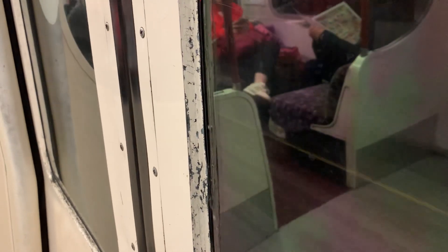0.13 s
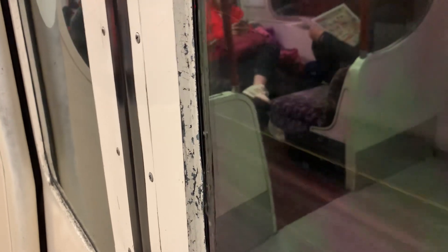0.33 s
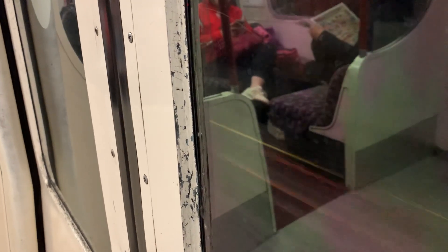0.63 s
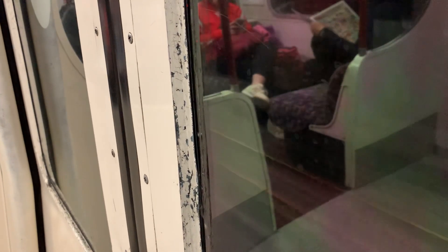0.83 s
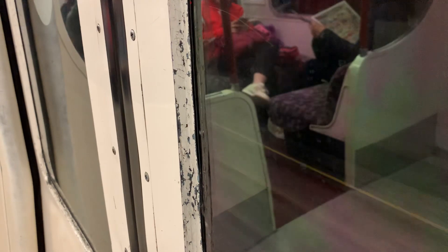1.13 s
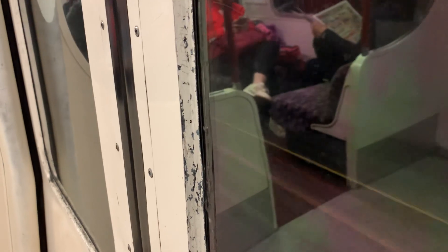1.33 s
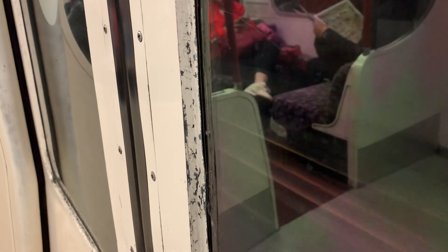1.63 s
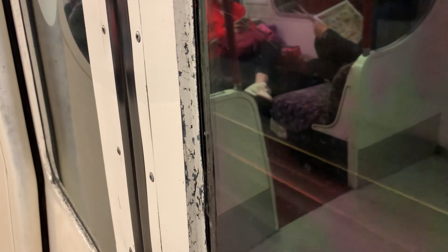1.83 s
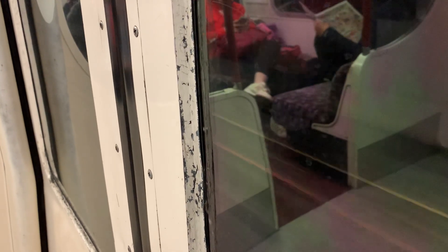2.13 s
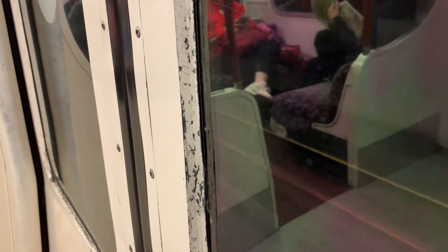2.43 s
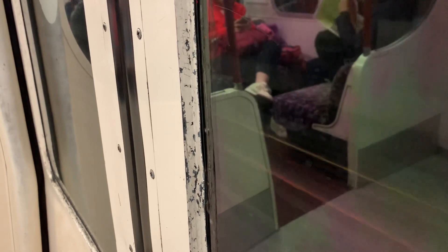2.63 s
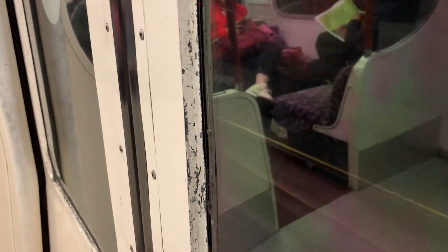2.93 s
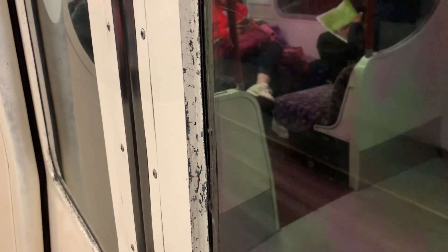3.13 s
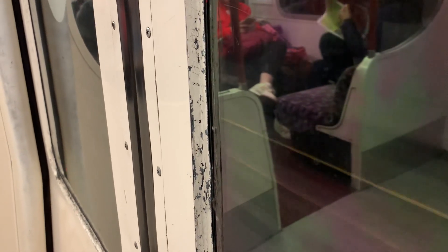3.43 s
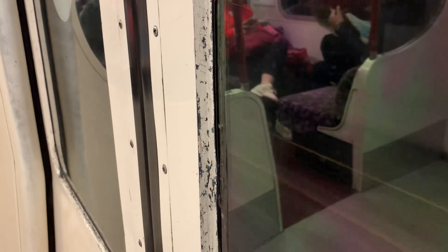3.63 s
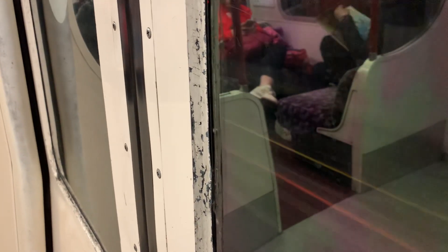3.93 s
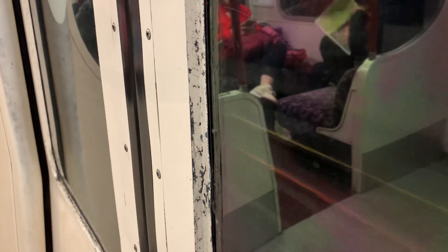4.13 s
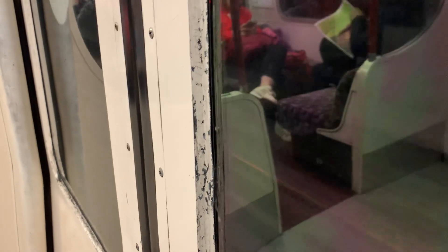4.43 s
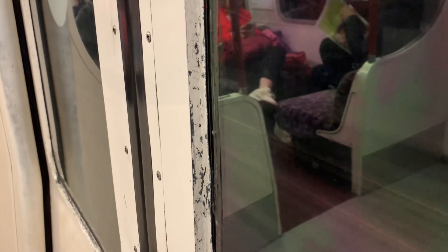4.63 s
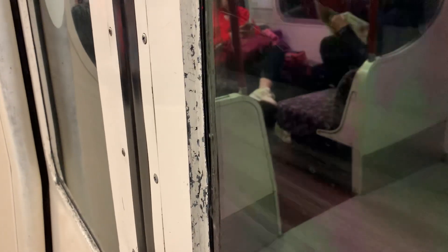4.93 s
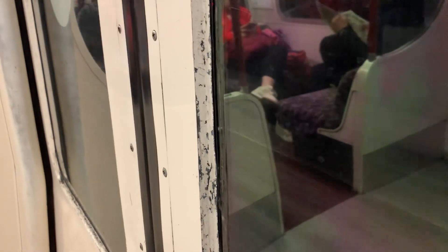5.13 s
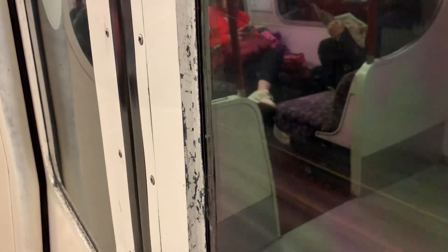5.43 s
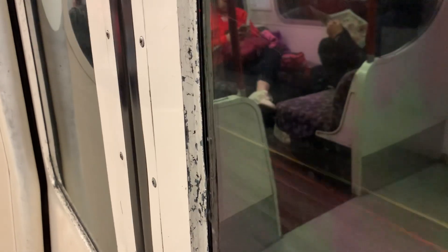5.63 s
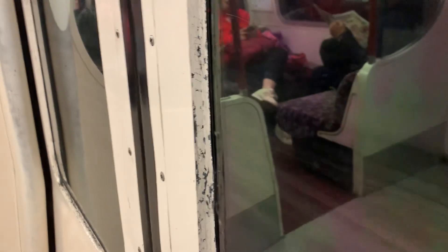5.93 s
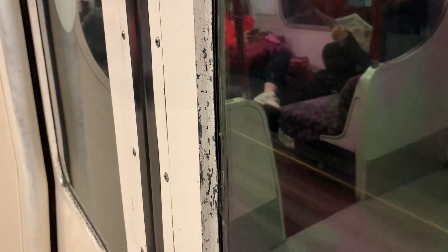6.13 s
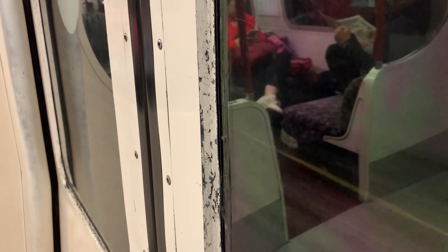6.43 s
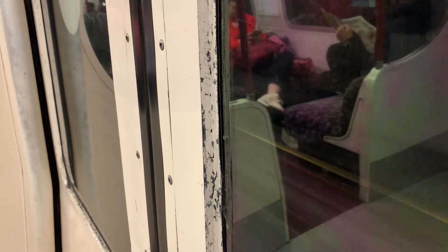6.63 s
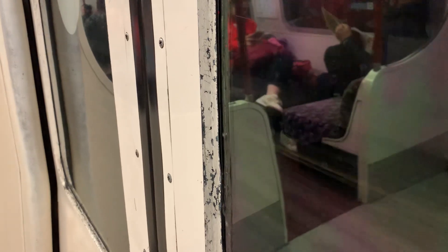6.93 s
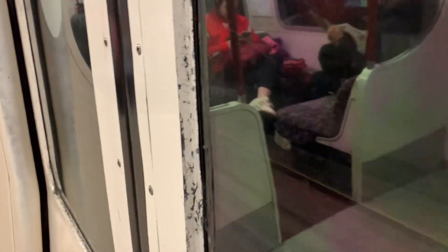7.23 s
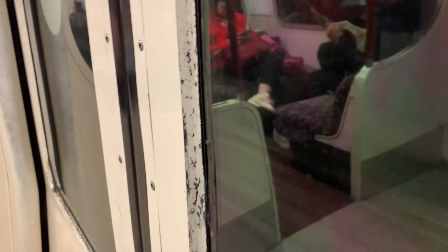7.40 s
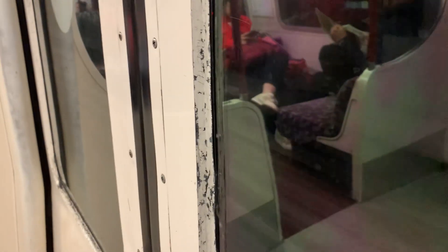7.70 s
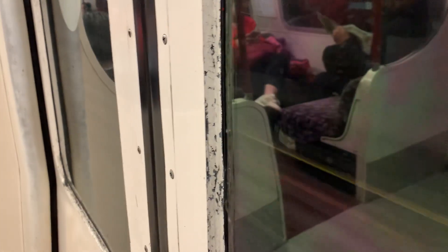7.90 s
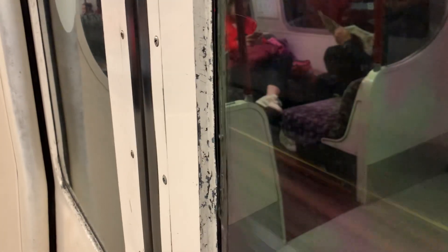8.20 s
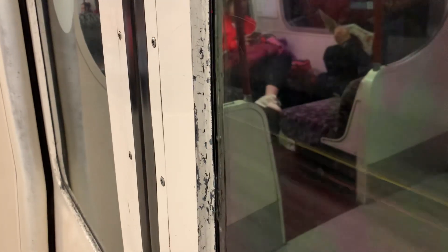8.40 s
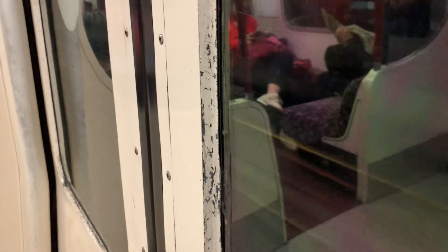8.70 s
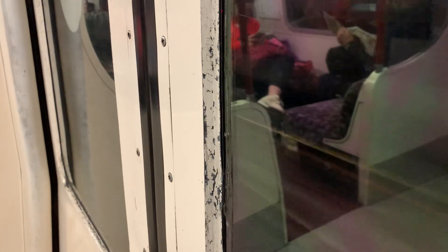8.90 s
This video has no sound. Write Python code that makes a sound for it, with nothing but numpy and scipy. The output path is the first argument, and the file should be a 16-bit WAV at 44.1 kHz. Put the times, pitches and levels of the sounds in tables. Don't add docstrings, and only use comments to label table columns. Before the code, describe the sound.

Inside an underground carriage running through a tunnel, stereo microphone close to the door on the right, bass weaker on the left. Throughout, a deep uneven rumble, grainy mid wheel roar and thin steady air hiss. From 0 to 3 s a wavering, beating rail whine around 800 Hz swells and dips, strongest near 2.5 s, with short singing bursts around 1 s and a light rattle at 0.5 s. The whine falls away after 3 s. At 3.9 s a hard metallic clack with bright crackle. From 4.9 to 6 s the shell lurches; small knocks and brief high squeaks come at 5.1, 5.7 and 6.4 to 6.7 s, with a clunk at 6.85 s. A very faint high motor tone slowly sinks. From 7 s the floor booms and drones in overlapping low notes, heaviest from 7.7 s to the end at 9 s, with rough scrubbing, low groaning squeals, louder roar and gustier hiss.

```python
import sys
import numpy as np
from scipy import signal
from scipy.fft import rfft, irfft, next_fast_len
from scipy.io import wavfile

SR = 44100
rng = np.random.default_rng(int(sys.argv[2]) if len(sys.argv) > 2 else 0)


def ratio(d):
    e = np.asarray(d, float) / 20
    return 10 ** e


def dump_mix(stems):
    frames = np.atleast_2d(stems).T
    limited = np.clip(frames, -1, 1)
    pcm = np.round(limited * 32767).astype(np.int16)
    wavfile.write(sys.argv[1], SR, pcm)


N = 399546

# freq_hz, density_db (per Hz)
SHELL_SPECTRUM = [(14, -29), (25, -9.5), (38, -9.5), (50, -4), (65, -1.5), (90, -4), (110, -7), (140, -34)]
FLOOR_SPECTRUM = [(80, -36), (110, -2), (200, -1.5), (260, -4.5), (330, -6), (450, -11.5), (800, -21)]
ROAR_SPECTRUM = [(220, -11.5), (340, 2), (500, -1.5), (700, 0), (950, -3.5), (1100, -9), (1300, -16),
                 (1700, -33.5)]
WHEEL_SPECTRUM = [(1000, -49), (1350, 3.5), (1700, 2), (2500, -2), (3000, -8), (4000, -13), (6500, -27.5)]
SEAL_SPECTRUM = [(2000, -22.5), (3000, -3), (4500, -3), (5500, -11), (7000, -10), (8500, -9.5),
                 (10500, -13.5), (12500, -17.5), (15200, -25)]
# freq_hz, width_hz, lift_db
SHELL_MODES = [(66.8, 9.2, 5.5), (90.5, 30, 6.5)]
FLOOR_MODES = [(140, 25, 6.95), (170.7, 21, 3.8), (201, 18, 2.9), (239.3, 24, 6.1), (300, 15, 6.9),
               (362, 10, 1.5)]
WHEEL_MODES = [(2208, 390, 8.1)]
# freq_hz, width_hz, level_db
RAIL_MODES = [(802, 29, -1.5), (960, 69, -8.5)]
# time_s, boom_db
TRACK_ROUGHNESS = [(0, -23), (1.5, -27), (2.9, -27), (3.4, -26), (3.9, -27.5), (4.3, -27.5), (4.8, -25),
                   (5.5, -25), (6.7, -22.5), (7.3, -19), (7.9, -15.5), (8.45, -16), (8.76, -17),
                   (9.06, -12)]
# start_s, length_s, lift_db
LURCHES = [(0.554, 0.22, -0.5), (1.06, 0.25, 2.5), (2.21, 0.18, -2), (2.704, 0.5, 1), (3.45, 0.37, 3.5),
           (3.843, 0.16, 5.5), (4.9, 0.34, 4.5), (5.234, 0.56, 5.5), (5.913, 0.24, 7.5), (6.397, 0.18, 4),
           (7.14, 0.14, 3), (7.49, 0.27, 3), (7.895, 0.24, 1)]
# time_s, roar_db
WHEEL_LOAD = [(0, -22), (0.6, -20), (1.1, -21.5), (1.6, -20.5), (2.2, -21.5), (3.05, -20.5), (3.38, -23.5),
              (3.75, -22), (4.31, -26), (5.0, -22), (5.6, -23), (6.3, -24), (7.1, -24), (7.75, -24.5),
              (7.95, -20.5), (8.15, -24), (8.38, -20), (8.55, -17), (8.75, -18), (9.06, -23)]
# low_hz, high_hz
RIPPLE_HZ = (790, 817)
# time_s, low_note_db, high_note_db
RIPPLE_LEVELS = [(0, -38, -36), (.3, -31, -33), (.6, -36, -29), (.85, -38, -31), (1.1, -40, -38),
                 (1.4, -40, -37), (1.6, -38, -28), (1.85, -35, -29), (2.05, -30, -33), (2.3, -33, -33),
                 (2.5, -27, -30), (2.7, -28, -31), (2.95, -29, -33), (3.15, -34, -35), (3.4, -37, -29),
                 (3.7, -40, -33), (4.2, -46, -40), (9.06, -55, -50)]
# start_s, length_s, pitch_hz, level_db
RAIL_SINGING = [(.78, 0.23, 956, -32.5), (1.27, 0.14, 960, -26.5), (1.42, 0.16, 1017, -34.5),
                (2.25, 0.18, 972, -35), (2.78, 0.15, 945, -30), (3.02, 0.13, 965, -34),
                (7.85, 0.2, 718, -28.5), (8.42, 0.12, 684, -23), (8.45, 0.34, 820, -35)]
# start_s, length_s, pitch_hz, level_db
RAIL_BURSTS = [(1.045, .055, 785, -25), (1.125, .05, 800, -22), (1.125, .11, 835, -28),
               (1.18, .025, 800, -24), (1.205, .022, 820, -24), (1.425, .035, 580, -23),
               (1.49, .035, 1000, -27), (2.88, .09, 632, -28), (3.0, .08, 770, -26), (.26, .08, 850, -29),
               (.52, .09, 835, -26)]
# start_s, length_s, level_db
SCRUBS = [
    (5.08, 0.36, -55),
    (7.75, 0.46, -36),
    (8.292, 0.64, -36),
    (8.5, 0.19, -38.5),
    (8.9, 0.32, -36),
]
# start_s, length_s, lift_db
GUSTS = [
    (.4, 0.14, 0),
    (1.1, 0.5, 1),
    (3.75, 0.22, 1.5),
    (4.293, 5.1, 2.5),
    (4.5, 0.39, 3),
    (4.945, 0.49, 4.5),
    (6.494, 0.89, 1.5),
    (7.686, 0.77, 2),
    (8.182, 0.83, 6),
    (8.456, 0.38, -1.5),
]
# time_s, pitch_hz, level_db
MOTOR_TONE = [
    (0, 4720, -72),
    (4.6, 4680, -68),
    (5.2, 4620, -60),
    (6.6, 4450, -62),
    (9.06, 4200, -72),
]
# start_s, rise_s, pitch_hz, level_db
RATTLES = [(.49, .044, 8600, -53.5), (.5, 0.055, 4200, -44.5), (.52, 0.035, 5600, -50),
           (0.571, .03, 4500, -48.5), (.57, 0.019, 5900, -48), (1.34, .015, 13000, -73),
           (2.319, .015, 1565, -48), (3.83, .004, 8940, -55), (3.879, 0.012, 1620, -31),
           (3.9, .015, 1850, -35), (3.885, .004, 2600, -32), (3.9, .004, 3600, -51),
           (3.92, .004, 2900, -43), (3.877, .002, 2320, -32), (3.879, .002, 3240, -43),
           (3.896, .002, 1090, -29), (3.913, .002, 1980, -30), (3.911, .002, 950, -23),
           (3.878, .002, 5200, -64), (4.089, 0.0087, 1500, -34), (4.619, .012, 4120, -47),
           (5.004, .005, 5930, -49), (5.13, 0.017, 2120, -29), (5.152, 0.018, 2500, -51),
           (5.289, 0.019, 4600, -58), (5.751, .01, 3250, -46), (6.388, 0.018, 2180, -25),
           (6.68, .12, 13000, -60), (6.842, .003, 1590, -32), (6.847, .002, 1260, -32.5),
           (6.73, .004, 2250, -41), (6.965, .004, 2100, -37), (6.447, .01, 2100, -39),
           (5.185, .004, 2030, -37), (5.135, .004, 2300, -40), (6.89, 0.0058, 9000, -53),
           (7.299, 0.022, 4630, -47.5), (7.80, 0.0074, 4800, -54), (7.979, .004, 2100, -35),
           (8.338, 0.0037, 9700, -49.5), (8.457, .002, 8600, -44), (8.461, 0.0013, 10200, -43),
           (8.461, .0013, 12800, -50)]
# start_s, t60_s, level_db
CRACKLES = [(3.83, 0.2, -47), (3.876, 0.28, -35), (3.899, 0.09, -45), (3.913, .1, -46), (6.845, .05, -47),
            (7.891, .06, -50), (7.977, .08, -46), (5.005, 0.24, -43), (5.289, .12, -45), (6.891, .15, -46),
            (7.80, 0.15, -52), (8.456, .05, -45)]
# start_s, length_s, pitch_hz,
# level_db
PANEL_HUMS = [(.72, 0.15, 300, -30), (1.25, 0.19, 165.6, -21.5), (1.42, 0.25, 245, -24.5),
              (1.78, 0.17, 163, -22), (2.2, 0.37, 163.8, -26.5), (2.8, 0.18, 316, -28),
              (5.4, 0.15, 203, -22), (5.6, 0.28, 225.7, -23), (5.3, 0.48, 362, -38),
              (6.06, .2, 170, -19.5), (6.1, 0.25, 120, -21), (6.26, 0.27, 198, -23.5),
                (6.55, 0.34, 174.2, -17), (6.653, 0.13, 308, -25), (6.8, 0.08, 194.4, -17),
                (6.85, 0.26, 140.3, -27), (7.7, 0.16, 138, -14.5), (7.28, 0.18, 120, -14.5),
                (7.279, 0.21, 211, -30), (7.38, 0.24, 165.7, -16.5), (7.44, .12, 129, -23),
                (7.521, 0.19, 66, -15), (7.55, 0.25, 192, -25), (7.56, .16, 274.3, -22),
                (7.578, 0.29, 300, -22.5), (7.6, 0.1, 133.6, -18), (7.696, .14, 318, -22),
                (7.77, 0.16, 176.6, -14.5), (7.76, 0.14, 212.5, -17), (7.73, 0.15, 138, -14),
                (7.68, 0.09, 262, -19), (7.93, .24, 138.8, -12.5), (7.92, 0.15, 204, -18),
                (7.914, 0.18, 52.6, -23), (8.15, 0.1, 190, -13.5), (8.101, .14, 248.3, -26),
                (8.16, 0.16, 198.7, -20.5), (8.158, 0.25, 301, -18), (8.32, .16, 131.5, -19),
                (9.6, 0.18, 201.6, -15.5), (8.329, 0.18, 252.5, -20), (8.34, 0.28, 150.4, -18.5),
                (8.409, 0.13, 260, -20.5), (8.45, .2, 165.7, -10.5), (8.48, .24, 197.2, -13),
                (8.5, 0.39, 249.5, -21), (8.444, 0.27, 48, -22), (8.64, 0.15, 185, -12),
                (8.661, 0.14, 239.4, -19.5), (8.622, 0.31, 300, -17), (8.66, 0.34, 203, -12),
                (8.77, 0.14, 144.6, -11.5), (8.86, 0.16, 133, -12), (8.8, 0.12, 178, -19),
                (8.938, 0.42, 368, -24), (8.349, 0.29, 419, -23.5)]
# start_s, length_s, pitch_hz, level_db
SQUEALS = [(2.70, .07, 2250, -44), (3.874, .05, 1630, -44), (5.72, .14, 2150, -43), (5.125, .1, 2150, -43),
           (5.135, .15, 2400, -46), (5.7, .2, 2350, -44), (6.1, .12, 2200, -43), (6.68, .06, 2200, -47),
           (6.375, .12, 2130, -41), (6.54, .08, 2200, -42), (7.26, .08, 2150, -39), (7.7, .35, 690, -30),
           (8.38, .4, 660, -25), (2.0, .2, 2250, -46)]
# start_s, length_s, pitch_hz, level_db
CHIRPS = [(5.127, .028, 2040, -36), (5.152, .022, 2150, -36), (5.138, .018, 2600, -39),
          (5.165, .11, 2500, -45), (6.395, .045, 2120, -37), (6.4, .03, 2230, -39), (6.44, .03, 2180, -40),
          (6.452, .036, 2080, -37), (6.49, .07, 2320, -45), (6.57, .045, 2100, -36),
          (6.565, .09, 4450, -56), (5.77, .03, 2030, -43), (5.715, .05, 2430, -45), (5.81, .05, 2250, -44),
          (6.16, .04, 2200, -41), (6.69, .045, 2100, -42), (6.722, .02, 2270, -40)]
# freq_hz, likeness (0-1), left_db, left_lead_rad
PORTS = [(30, .98, -1.0, -.24), (75, .97, -4.2, -.47), (130, .9, -10.0, -.4), (170, .8, -12.5, .1),
         (260, .74, -8.7, .9), (310, .6, -8.0, 1.3), (380, .6, -2.2, 2.0), (520, .4, -.3, 1.6),
         (780, .54, -1.8, 1.75), (1050, .32, .3, 2.1), (1300, .16, -.1, 2.6), (2100, .4, -.9, 4.6),
         (2600, .2, -.9, 5.2), (4000, .15, -.2, 8.5)]

TIME = np.arange(N) / SR
SIZE = next_fast_len(N + 4096)
HZ = np.maximum(np.fft.rfftfreq(SIZE, 1 / SR), 1)


def in_time(rows):
    time_s, *columns = np.transpose(rows)
    return [np.interp(TIME, time_s, column) for column in columns]


def at_hz(table, column=1):
    table = np.array(table)
    return np.interp(np.log(HZ), np.log(table[:, 0]), table[:, column])


def rms_one(x):
    return x / np.sqrt(np.mean(x ** 2) + 1e-20)


def drift(rate_hz):
    pole = np.exp(-80 * np.pi * rate_hz / SR)
    white = rng.standard_normal(N // 40 + 2002)
    slow = signal.lfilter([1], [1, -2 * pole, pole * pole], white)[2000:]
    return np.interp(np.arange(N) / 40, np.arange(len(slow)), rms_one(slow))


def swell(start_s, length_s):
    progress = np.clip((TIME - start_s) / max(length_s, .01), 0, 1)
    return np.sin(np.pi * progress) ** 2


def swells(events):
    return sum(db * swell(start_s, length_s) for start_s, length_s, db in events)


def peak(hz, width_hz):
    return 1 / (1 + (2 * (HZ - hz) / width_hz) ** 2)


def noise(gain):
    white = rfft(rng.standard_normal((2, SIZE)))
    return rms_one(irfft(white * gain, SIZE)[:, :N])


def coloured(spectrum, modes=()):
    lift_db = sum(db * peak(hz, width_hz) for hz, width_hz, db in modes)
    outside = np.maximum(HZ / spectrum[-1][0], spectrum[0][0] / HZ)
    octaves_beyond = np.log2(np.maximum(outside, 1))
    return noise(ratio(at_hz(spectrum) + lift_db - 36 * octaves_beyond))


def wavering(pitch_hz, wander, rate_hz):
    phase = 2 * np.pi * np.cumsum(pitch_hz * (1 + wander * drift(rate_hz))) / SR
    return np.sqrt(2) * np.array([np.sin(phase), np.cos(phase)])


def hums(notes, wander, rate_hz):
    out = np.zeros((2, N + SR))
    stray = wander * drift(rate_hz)
    for k, (start_s, length_s, hz, db) in enumerate(notes):
        at, span = round(start_s * SR), round(length_s * SR)
        own_stray = np.roll(stray, k * SR // 3)[:span]
        phase = 2 * np.pi * np.cumsum(hz * (1 + own_stray)) / SR
        tone = np.array([np.sin(phase), -np.cos(phase)])
        out[:, at:at + span] += ratio(db + 3) * np.hanning(span) ** .6 * tone
    return out[:, :N]


def contacts(rise_s, t60_s, db, sos):
    t = np.arange(SR // 2) / SR
    hits = rng.standard_normal((2, len(t))) * ratio(0.91 * rng.exponential(1, len(t)))
    onset = np.clip(t / max(rise_s, 1e-4), 0, 1)
    decay = ratio(-60 * np.maximum(t - rise_s, 0) / max(t60_s, .01))
    return ratio(db) * onset * decay * rms_one(signal.sosfilt(sos, hits))


def body():
    boom_db, = in_time(TRACK_ROUGHNESS)
    sag_db = 8.5 * np.maximum(TIME - 8.37, 0)
    rumble_db = -28.5 - sag_db + swells(LURCHES)
    rumble = ratio(rumble_db + 5.5) * coloured(SHELL_SPECTRUM, SHELL_MODES)
    boom = ratio(boom_db + 4.5 + 0.62 * drift(4.6)) * coloured(FLOOR_SPECTRUM, FLOOR_MODES)
    return rumble + boom


def ripples():
    out = 0
    for hz, db in zip(RIPPLE_HZ, in_time(RIPPLE_LEVELS)):
        out = out + ratio(db - 3.5 + 2.5 * drift(10)) * wavering(hz, .004, 16)
    return out * [[1], [-1]]


def rolling():
    roar_db, = in_time(WHEEL_LOAD)
    roar = ratio(roar_db + 1 + 1.2 * drift(14)) * coloured(ROAR_SPECTRUM)

    rail = sum(ratio(db) * peak(hz, width_hz) for hz, width_hz, db in RAIL_MODES)
    worn_rail_end_s, fade_db_per_s, smooth_rail_db = 3.1, 7, -39
    whine_db = -32 - fade_db_per_s * np.maximum(TIME - worn_rail_end_s, 0)
    whine_db = np.maximum(whine_db, smooth_rail_db)
    whine = ratio(whine_db + 3.1 * drift(21)) * noise(rail)

    slowing_db = 0.09 * (TIME - TIME.mean())
    load_db = 0.52 * (roar_db - roar_db.mean())
    flicker_db = .5 * drift(5) + 1.2 * drift(27)
    ring = ratio(-39.5 - slowing_db + load_db + flicker_db) * coloured(WHEEL_SPECTRUM, WHEEL_MODES)

    scrub_level = sum(ratio(db) * swell(start_s, length_s) for start_s, length_s, db in SCRUBS)
    scrub = scrub_level * coloured(WHEEL_SPECTRUM)
    return roar + whine + ring + scrub + ripples() + hums(RAIL_SINGING + RAIL_BURSTS, 0.0052, 30)


def leak():
    gust_db = swells(GUSTS)
    hiss = coloured(SEAL_SPECTRUM)
    top = signal.sosfilt(signal.butter(2, 7100, "high", fs=SR, output="sos"), hiss)
    flutter_db, top_flutter_db = .7 * drift(14), .8 * drift(12)
    brightening = ratio(0.7 * gust_db + top_flutter_db) - 1
    return ratio(-52.5 + gust_db + flutter_db) * (hiss + brightening * top)


def motor():
    pitch_hz, level_db = in_time(MOTOR_TONE)
    return ratio(level_db - 8 + 4.0 * drift(25)) * wavering(pitch_hz, .01, 60)


def rattles():
    out = np.zeros((2, N + SR))
    for start_s, rise_s, hz, db in RATTLES:
        pole = np.exp(-np.pi * .22 * hz / SR)
        turn = 2 * np.pi * hz / SR
        ringing = [[0.95, 0.0037, -0.9, 1, -2 * pole * np.cos(turn), pole * pole]] * 2
        t60_s = 0.19 + 1.9 * rise_s
        out[:, round(start_s * SR):][:, :SR // 2] += contacts(rise_s, t60_s, db, ringing)
    bright = signal.butter(2, [800, 10500], "band", fs=SR, output="sos")
    for start_s, t60_s, db in CRACKLES:
        out[:, round(start_s * SR):][:, :SR // 2] += contacts(0.0049, t60_s, db, bright)
    return out[:, :N]


def panels():
    return hums(PANEL_HUMS, wander=.014, rate_hz=5.9)


def squeals():
    out = np.zeros((2, N + SR))
    for start_s, length_s, hz, db in SQUEALS:
        at, span = round(start_s * SR), round(length_s * SR)
        band = signal.butter(2, [hz - 120, hz + 120], "band", fs=SR, output="sos")
        grip = rms_one(signal.sosfilt(band, rng.standard_normal((2, span))))
        out[:, at:at + span] += ratio(db + 3) * np.hanning(span) * grip
    return out[:, :N]


def chirps():
    return ratio(-2) * hums(CHIRPS, wander=.008, rate_hz=40)[0]


def ports(pair, alike, left_gain):
    heard, other = rfft(pair, SIZE)
    alike = np.clip(alike, 0, 1)
    left = left_gain * (alike * heard + np.sqrt(1 - alike ** 2) * other)
    return np.array([irfft(left, SIZE)[:N], pair[0]])


def scene():
    shade = ratio(at_hz(PORTS, column=2)) * np.exp(1j * at_hz(PORTS, column=3))
    tunnel = ports(body() + rolling() + panels() + squeals(), at_hz(PORTS), shade)
    door_lag_s = 0.000215
    lag = np.exp(-2j * np.pi * HZ * door_lag_s)
    door = ports(leak() + motor(), 0.92, lag)
    fittings = ports(rattles(), 0.97, lag)
    return tunnel + door + fittings + chirps()


def band_limit(x):
    return signal.sosfilt(signal.butter(12, 15300, fs=SR, output="sos"), x)


def record(dry):
    ceiling = .93
    limited = dry / (1 + np.abs(dry / ceiling) ** 4) ** .25
    return band_limit(limited)


dry = scene()
out = record(dry)
dump_mix(out)
```